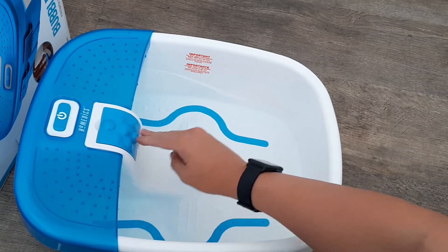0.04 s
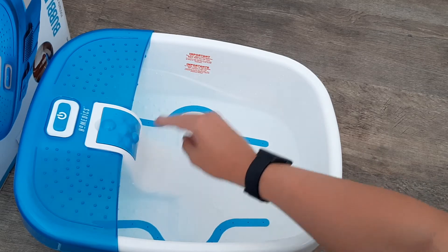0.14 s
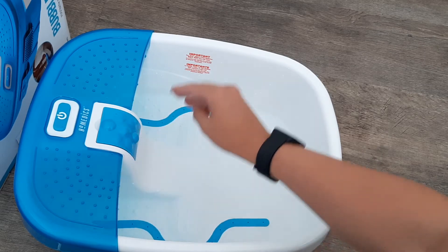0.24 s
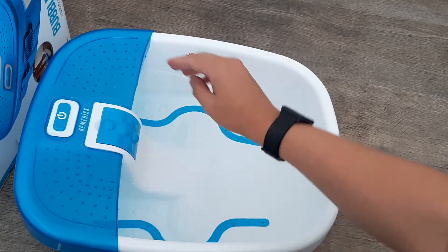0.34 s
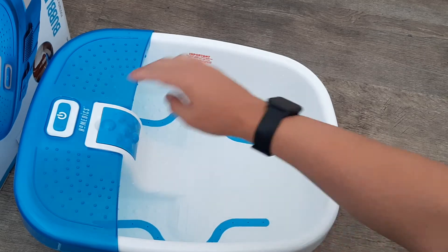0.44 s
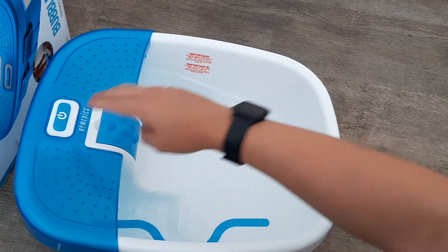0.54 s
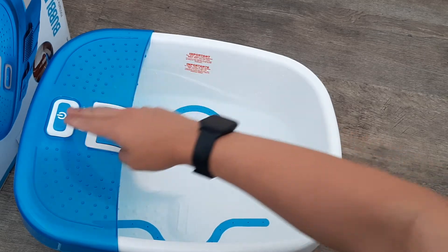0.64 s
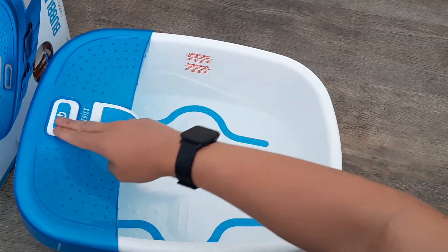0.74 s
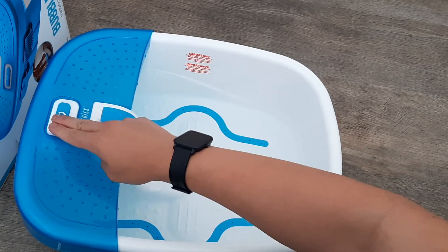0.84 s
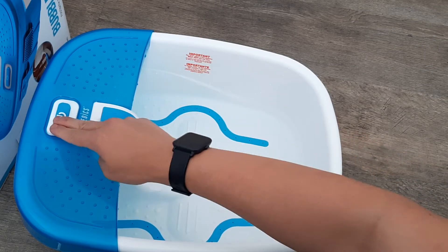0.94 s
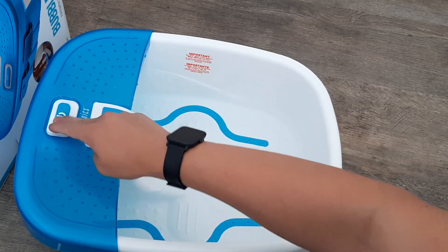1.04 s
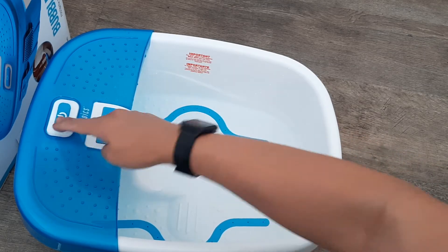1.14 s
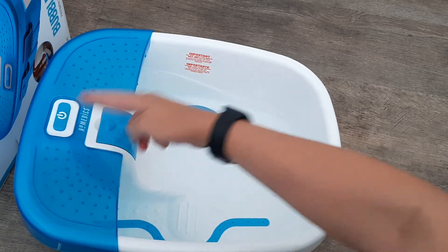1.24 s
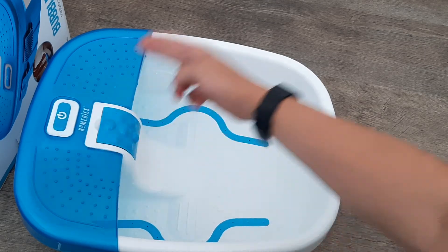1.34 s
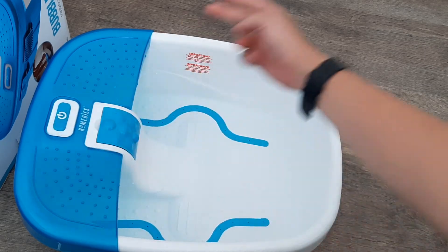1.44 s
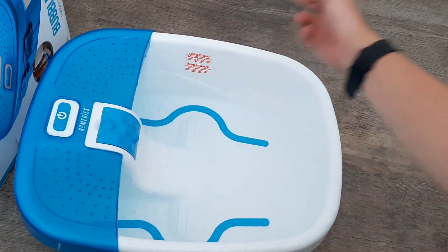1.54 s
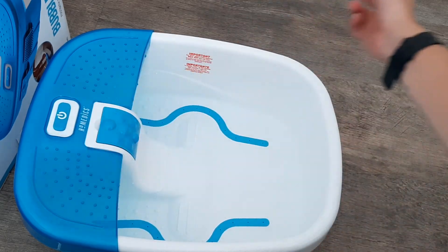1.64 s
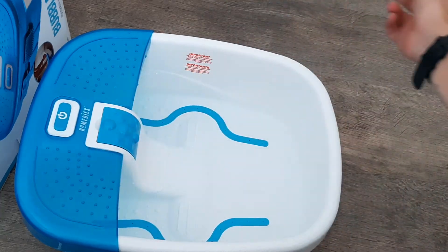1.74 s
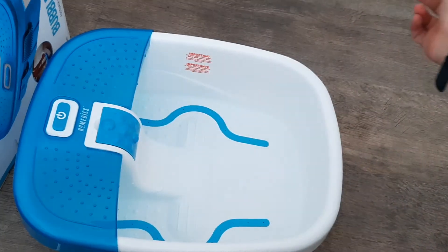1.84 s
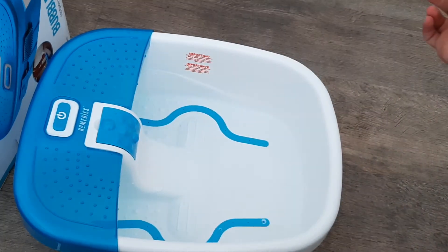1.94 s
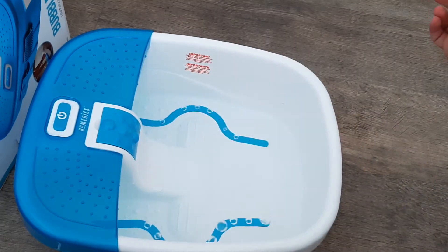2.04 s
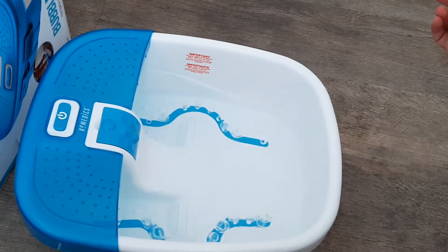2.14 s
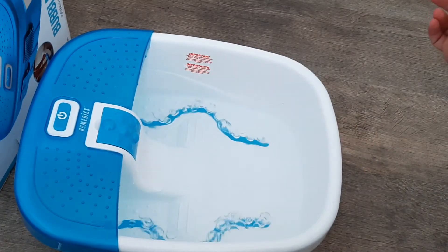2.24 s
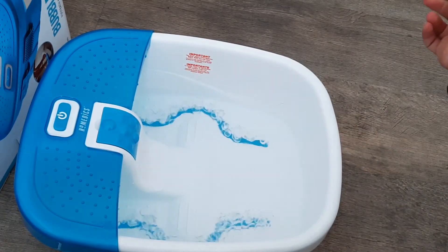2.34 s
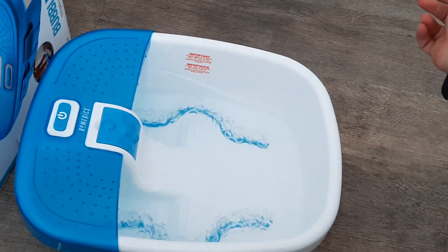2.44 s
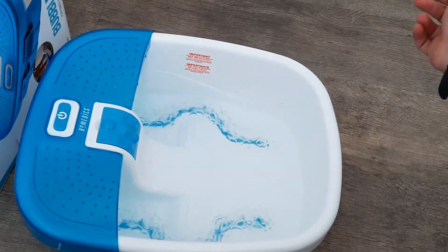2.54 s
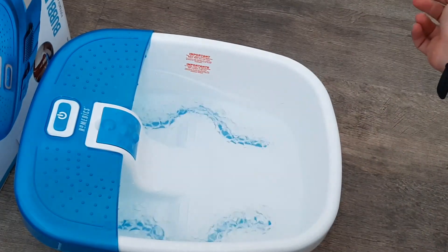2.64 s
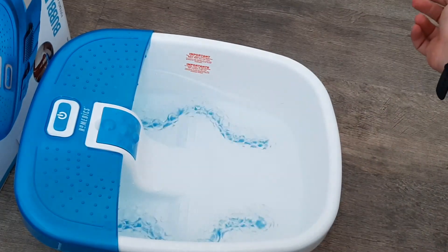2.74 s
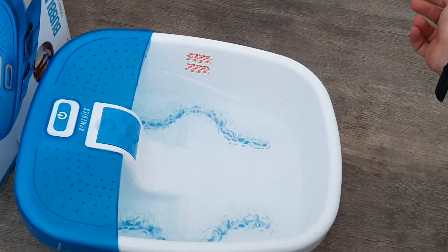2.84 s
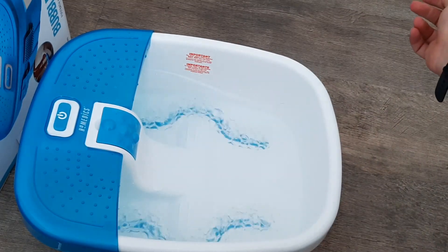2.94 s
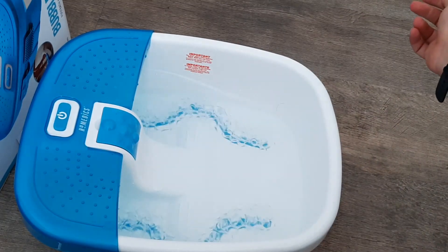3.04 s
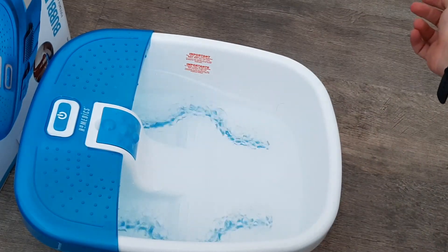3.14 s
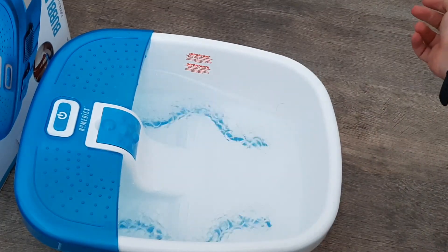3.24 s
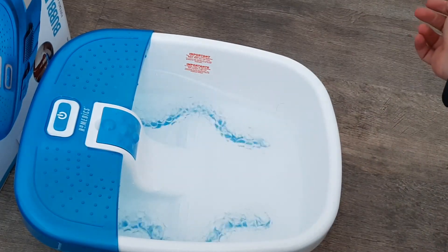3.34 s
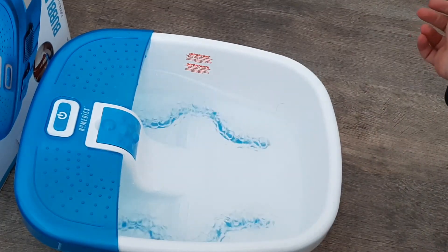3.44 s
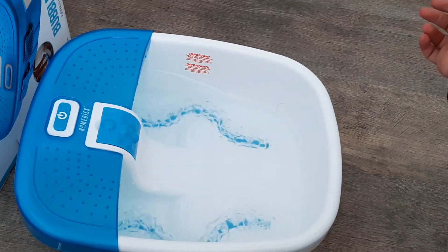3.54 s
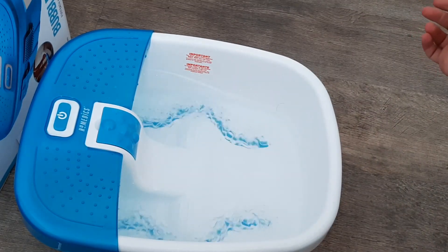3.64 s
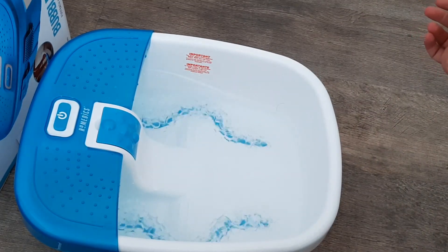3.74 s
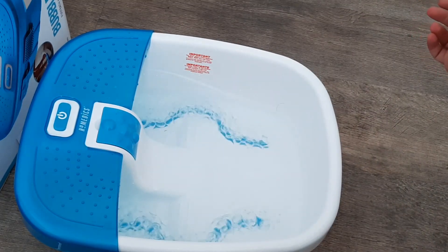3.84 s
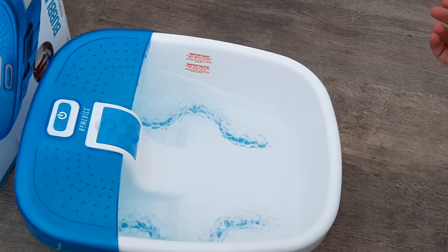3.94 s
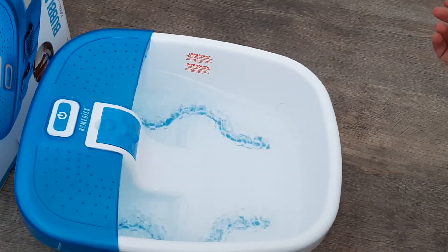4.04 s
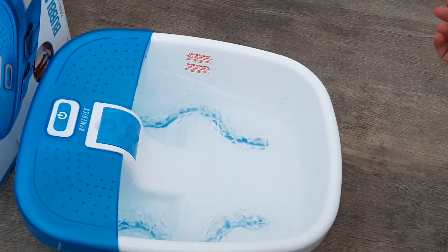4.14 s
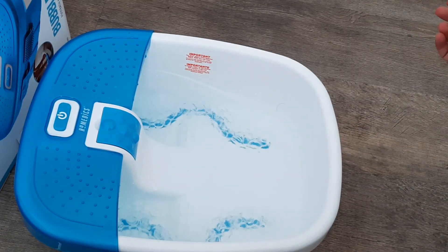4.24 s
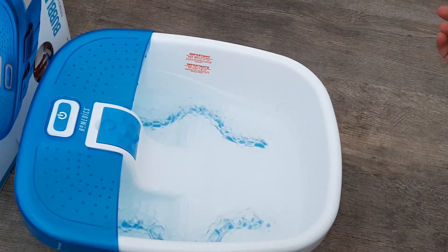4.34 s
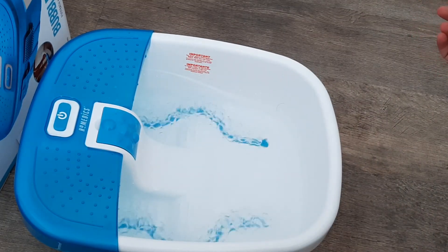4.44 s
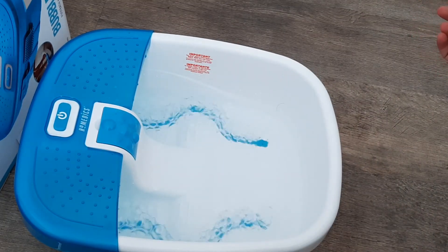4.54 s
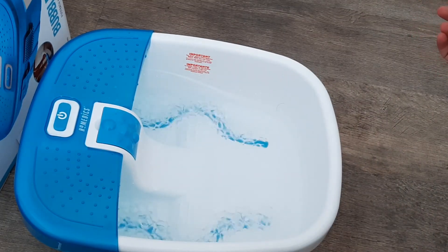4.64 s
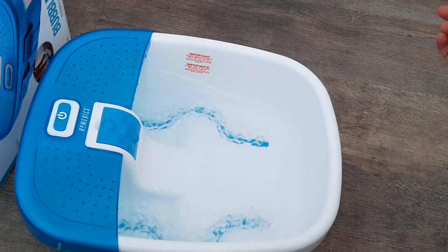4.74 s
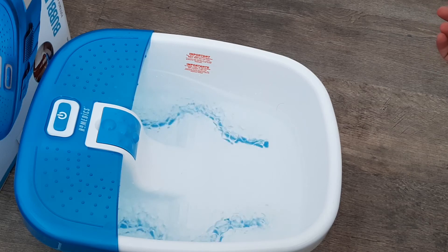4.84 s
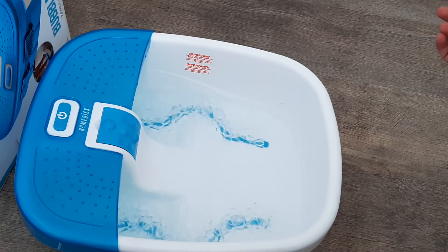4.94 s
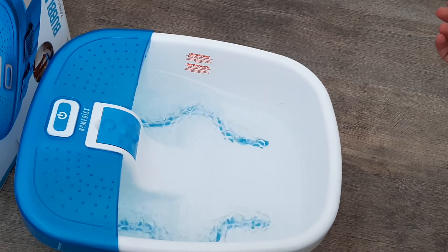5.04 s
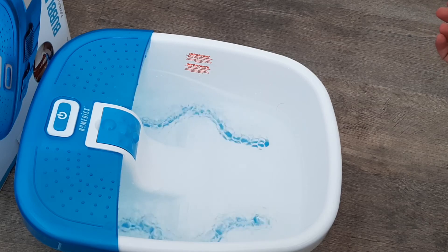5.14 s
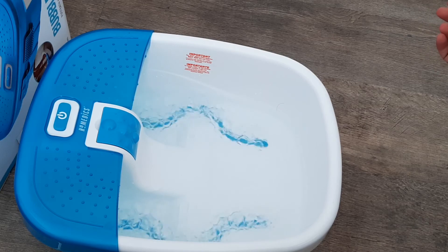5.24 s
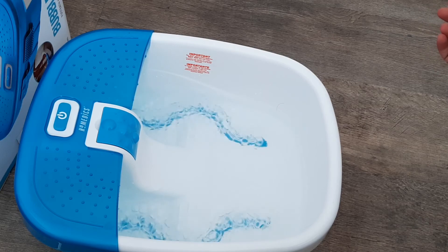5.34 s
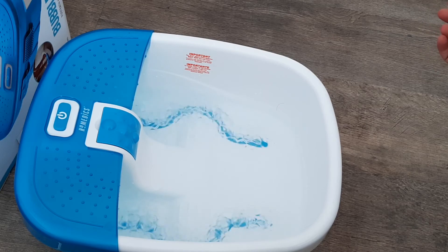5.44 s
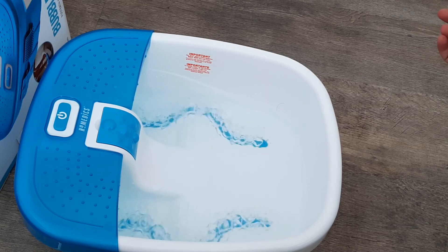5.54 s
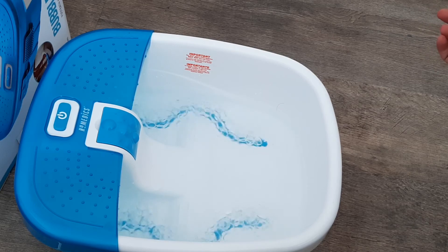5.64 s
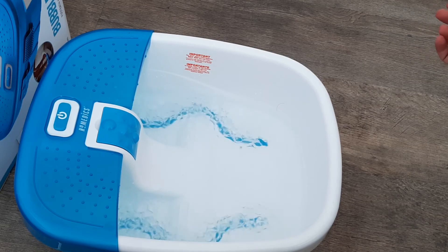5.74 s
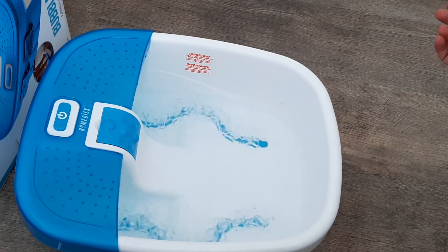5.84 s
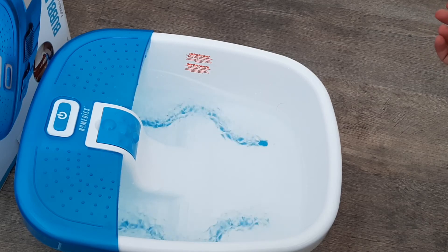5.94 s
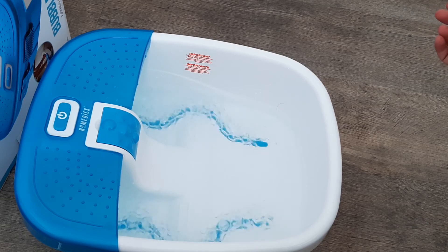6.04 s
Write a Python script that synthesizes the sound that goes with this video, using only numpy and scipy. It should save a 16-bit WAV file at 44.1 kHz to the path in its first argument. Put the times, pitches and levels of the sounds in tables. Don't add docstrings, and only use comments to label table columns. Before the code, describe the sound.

Quiet, bare room with a hard floor. A finger taps a plastic switch, presses it and it snaps back: three dry clicks, each louder. A small air pump spins up at once, its hum and whine gliding upward. About a second later air breaks into the water tub, and dense bubbling with round, hollow gulps continues to the end over the whining motor and hissing air. Close stereo microphone.

```python
import sys
import numpy as np
from scipy import signal
from scipy.fft import rfft, irfft, next_fast_len
from scipy.io import wavfile

SR = 44100
rng = np.random.default_rng(int(sys.argv[2]) if len(sys.argv) > 2 else 0)


def materialize(psi):
    bounded = np.clip(np.atleast_2d(psi).T, -1, 1)
    quanta = np.round(bounded * 32767).astype(np.int16)
    wavfile.write(sys.argv[1], SR, quanta)


def ratio(d):
    e = np.asarray(d, float) / 20
    return 10 ** e


N = 268569
BOIL_S = 2.01


def unit(x):
    return x / np.sqrt(np.mean(x ** 2) + 1e-20)


def along(points, hz):
    f, v = np.transpose(points)
    return np.interp(np.log(hz + 1), np.log(f + 1), v)


def wobble(rate):
    knots = rng.standard_normal((2, int(N * rate / SR) + 4))
    place = np.arange(N) * rate / SR
    return np.array([np.interp(place, np.arange(knots.shape[1]), k) for k in knots], np.float32)


def filtered(x, response):
    m = next_fast_len(x.shape[-1] + SR // 4)
    return irfft(rfft(x, m) * response(np.fft.rfftfreq(m, 1 / SR)), m)[..., :x.shape[-1]]


def ringing(x, modes):
    def response(f):
        total = 0
        for k, (centre, width, db) in enumerate(modes):
            damping = 1j * f * width
            total = total + (-1) ** k * ratio(db) * damping / (centre * centre - f * f + damping)
        return total
    return filtered(x, response)


# (f/Hz, correlation)
PORT_LIKENESS = [(60, 0.84), (180, 1), (550, 0.84), (1650, 0.047), (4970, -0.17), (15000, -0.08)]


def ports(pair):
    def mix(hz):
        angle = np.arccos(np.clip(along(PORT_LIKENESS, hz), -1, 1)) / 2
        return np.array([np.cos(angle), np.sin(angle)])
    mid, side = filtered(pair, mix)
    return np.array([mid + side, mid - side])


def noise(spectrum):
    return unit(filtered(ports(rng.standard_normal((2, N))), lambda hz: ratio(along(spectrum, hz))))


# (f/Hz, level/dB)
PORT_NOTCH = [(7500, 0.5), (8100, -12.5), (8600, -29), (9200, -10.5), (10500, -11), (12000, -1.5),
              (15000, 2)]


def port_gain(hz):
    return ratio(along(PORT_NOTCH, hz))


# (f/Hz, t60/s)
ROOM_DECAY = [(200, 0.32), (600, 0.37), (1500, 0.3), (4000, 0.31), (10000, 0.26)]


def tail():
    hz, t, z = signal.stft(rng.standard_normal((2, SR // 2)), SR, nperseg=256)
    decay = ratio(-60 * t / along(ROOM_DECAY, hz)[:, None])
    echo = ports(signal.istft(z * decay, SR, nperseg=256)[1])
    return echo / np.linalg.norm(echo[0])


def stirred(x):
    stir_s = 0.3
    out, step = np.zeros((2, N + SR)), round(stir_s * SR)
    for start in range(round((BOIL_S - 2 * stir_s) * SR), N, step):
        fade = np.hanning(2 * step)[:N - start] ** 0.5
        part = x[:, start:start + 2 * step] * fade
        answer = signal.fftconvolve(part, tail(), axes=1)
        out[:, start:start + answer.shape[1]] += answer
    return out[:, :N]


# (f/Hz, level/dB per Hz)
CIRCUIT_COLOUR = [(3000, -21), (7000, -15), (10000, -8), (13000, 1), (15500, 5)]


def circuit_hiss():
    return ratio(-78.5) * noise(CIRCUIT_COLOUR)


# (f/Hz, level/dB per Hz)
ROOM_TONE = [(15, -73), (25, -46), (54, -10.5), (75, -4.5), (95, -11), (112, -11), (130, -3.5), (161, -14),
             (265, -12), (299, -22), (362, -21.5), (1090, -31), (1350, -28), (7500, -46.5), (9750, -93),
             (16500, -120)]


def room_tone():
    fast_db = shaft()[1]
    floor_db = np.clip(-43 + 3.1 * fast_db, -69.5, -56)
    return ratio(floor_db + 0.5 + 0.99 * wobble(3.2)) * noise(ROOM_TONE)


# (t/s, level/dB peak, rattle/s)
CONTACTS = [
    (0.779, -38, 0.045),
    (0.99, -25.5, 0.028),
    (1.179, -21, 0.018),
]
# (f/Hz, level/dB per Hz)
TOUCH_COLOUR = [(71, -53), (120, -25), (195, -10), (296, -1.5), (355, -6), (474, -14), (632, -32),
                (680, -26), (1260, -22), (1530, -13), (1970, -31), (3390, -25), (9000, -45), (11700, -78),
                (19800, -120)]
# (f/Hz, level/dB per Hz)
PRESS_COLOUR = [(88, -41), (150, -18), (213, -11), (253, -24), (388, -13), (681, -4.5), (1040, -26.5),
                (1510, 1), (2700, -12), (3750, -6), (4740, -20.5), (6980, -20), (8470, -31), (10100, -15),
                (15500, -27)]
# (f/Hz, level/dB per Hz)
RELEASE_COLOUR = [(88, -38), (150, -18), (411, 0), (480, 0.5), (694, -1), (1060, -20), (1480, -3.5),
                  (2650, -10), (3750, -3.5), (7400, -15.5), (8150, -23), (8640, -85), (9160, -41),
                  (11300, -26), (15500, -30)]


def switch():
    out = np.zeros((2, N))
    t = np.arange(SR // 8) / SR
    for (s, db, rattle_s), colour in zip(CONTACTS, (TOUCH_COLOUR, PRESS_COLOUR, RELEASE_COLOUR)):
        blows = rng.standard_normal(len(t)) * np.exp(-(t / rattle_s) ** 4) * 0.022
        blows[0] = 1
        answer = signal.fftconvolve(blows[None], tail(), axes=1)
        answer[:, 20:90] *= 1.2
        sound = filtered(answer, lambda hz: ratio(along(colour, hz)) / port_gain(hz))
        sound *= 1 - np.exp(-np.arange(sound.shape[1]) / SR / 0.0004)
        level = ratio(db - 1.5) / (0.068 * np.linalg.norm(sound))
        out[:, round(s * SR):][:, :sound.shape[1]] += level * sound
    return out


# (t/s, f/Hz)
SPIN_UP = [(1.18, 25), (1.45, 86), (1.65, 128.6), (1.85, 166.5), (2.05, 198.8), (2.25, 222.1),
           (2.55, 245.5), (2.85, 259.7), (3.25, 270.3), (3.7, 276.9), (4.1, 280.6), (4.7, 283.1),
           (5.3, 284.4), (6.09, 285.35)]


def shaft():
    full_hz = 286
    s, hz = np.transpose(SPIN_UP)
    gap = np.interp(np.arange(N) / SR, s, np.log(full_hz - hz))
    speed = full_hz - np.exp(gap)
    return speed, 20 * np.log10(speed / full_hz)


# (f/Hz, level/dB)
FRAME_PATH = [(90, -100), (133, -60), (164, -33.5), (200, -32.5), (230, -22.5), (247, -31), (263, -25),
              (285, -30.5)]


def unbalance_hum(speed, turn):
    level_db = along(FRAME_PATH, speed) + 1.0 + 0.81 * wobble(20) + [[-0.3], [0.3]]
    return ratio(level_db) * np.sin(turn + [[0], [0.3]])


# (f/Hz, width/Hz, level/dB)
OUTLET_MODES = [(1320, 250, -43), (1717, 24, -29.5), (1782, 28, -31), (1853, 18.8, -29),
                (1904.7, 23.5, -34.5), (1981, 9.8, -42.5), (1991, 9.3, -45)]


def vane_tone(fast_db, turn):
    vane = ratio(2.57 * fast_db + 1.5 * wobble(12) + [[-1], [0]]) * np.sin(7 * turn + [[0], [2.1]])
    return ringing(vane, OUTLET_MODES)


# (multiple, level/dB over the rest)
STANDOUTS = [(6, -8), (8, -12), (9, -6.5), (10, 3), (12, 2), (15, 3), (17, -3), (20, 0), (25, 5), (27, -3),
             (30, 13), (35, -3), (40, 5), (45, 11), (50, -2), (55, 6)]
# (f/Hz, level/dB)
HOUSING_COLOUR = [(300, 21), (1500, -8.5), (2500, -6.5), (4500, -10.5), (7500, -5), (11000, -6),
                  (15000, -31)]


def comb_whine(fast_db, turn):
    extra_db = dict(STANDOUTS)
    comb = np.zeros(N)
    for k in set(range(2, 64)) - {7}:
        flicker, drift = wobble(7)
        comb += ratio(extra_db.get(k, 0)) * np.exp(0.32 * flicker) * np.sin(k * turn + 1.42 * drift)
    level = ratio(-45.5 + 3.3 * fast_db - 12.5)
    comb = filtered(level * comb, lambda hz: ratio(along(HOUSING_COLOUR, hz)))
    return 0.5 * comb + signal.fftconvolve(comb[None], tail(), axes=1)[:, :N]


BAR_MULTIPLES = [1, 3, 4, 5, 6, 8, 9, 10, 11, 12, 14, 15, 16, 17, 20, 25, 27, 29, 30, 35, 40, 45, 50]
BAR_LEVELS = [-38, -42, -47, -40, -44.5, -64.5, -57.5, -52.5, -61.5, -66, -81, -61.5, -58.5, -65, -56.5,
              -60.5, -61, -60, -75, -54, -63, -61, -57]
# (f/Hz, width/Hz, level/dB)
HOUSING_MODES = [(116, 9.1, -2), (164.8, 4.7, 7), (411, 47, 6.5), (505, 25, 5.5), (597, 56, 4.5),
                 (730, 146, -1.5), (1185, 95, 0), (1355, 22, 1.5), (1520, 47, 0), (1643, 9, 5),
                 (1712, 2, 2), (2102, 36, 9.5), (2390, 610, 0.5), (2427, 94, 9)]
# (f/Hz, width/Hz, level/dB)
SHELL_MODES = [(2647, 19, 5.5), (2820, 40, 2.5), (3300, 380, -2.5), (3795, 37, 2.4), (4230, 47, 3),
               (4464, 68, 7), (4825, 23, 7), (5690, 380, -0.5), (7130, 15, 3), (7090, 22, 3.5),
               (7480, 26, 4), (7660, 6.7, -1), (7640, 99, 7.4), (11800, 730, 0.91)]


def bar_whine(fast_db, turn):
    t = np.arange(N) / SR
    build_s, relief_s, bar_count = 0.55, 0.14, 5
    building = 2 * (t - SPIN_UP[0][0]) / build_s - 1
    relief = (BOIL_S - t) / relief_s + 1
    pressure = np.clip(np.minimum(building, relief), -1, 1) * (t < BOIL_S + relief_s)
    strain = ratio(5 * pressure)
    bars = np.zeros((2, N))
    for k, db in zip(BAR_MULTIPLES, BAR_LEVELS):
        beads, drift = wobble(18)
        apart = np.float32([[0], [min(0.44 * k, 1.5)]])
        load = strain if k < 7 or k % bar_count == 0 else 1
        bars += ratio(db) * np.exp(0.37 * beads) * load * np.sin(k * turn + apart + 0.9 * drift)
    return ringing(ratio(2.57 * fast_db) * bars, HOUSING_MODES + SHELL_MODES)


def vane_rub(turn):
    t = np.arange(N) / SR
    rub_s, length_s, panel_hz = 5.06, 0.12, 3183
    squeal = ratio(-45.5) * np.sin(10 * turn) + ratio(-51.5) * np.sin(2 * np.pi * panel_hz * t)
    return np.exp(-((t - rub_s) / length_s) ** 2) * squeal * ratio(2 * wobble(25))


# (f/Hz, level/dB per Hz)
AIR_COLOUR = [(300, -13), (900, -3), (1350, -1.5), (1650, -19), (2000, -9), (2400, -13.5), (3200, -11.5),
              (4500, -12), (5500, -13.5), (7500, -14), (15000, -28.5)]


def air_rush(fast_db):
    stalled_db = np.minimum(-48.5 + 2.53 * fast_db, -61.5)
    flow_db = -45 + 6.3 * fast_db
    return ratio(np.maximum(stalled_db, flow_db) + 3 + 0.8 * wobble(8)) * noise(AIR_COLOUR)


# (f/Hz, level/dB per Hz)
LID_COLOUR = [(40, -63), (70, -20), (134, -8.5), (232, -2.5), (290, -19), (360, 1), (480, 2), (700, -6),
              (1050, -26), (2000, -46)]
# (f/Hz, width/Hz, level/dB)
PANEL_MODES = [(1160, 150, 0), (1490, 60, 8), (1970, 120, 3), (3570, 200, -22), (4360, 110, -6),
               (6100, 310, -10), (7760, 200, 1)]


def lid_drone(fast_db):
    drone_db = np.clip(-37.5 + 4.9 * fast_db, -57, -43)
    rising_db, settling_db = -45 + 1.94 * fast_db, -56 - 5.3 * fast_db
    buzz_db = np.minimum(np.minimum(rising_db, settling_db), -52.5)
    drone = ratio(drone_db + 0.46 * wobble(33)) * noise(LID_COLOUR)
    buzz = ratio(buzz_db) * unit(ringing(rng.standard_normal((2, N)), PANEL_MODES))
    return drone + buzz


def motor():
    speed, fast_db = shaft()
    turn = np.float32(2 * np.pi * (np.cumsum(speed) / SR % 1))
    whine = comb_whine(fast_db, turn) + bar_whine(fast_db, turn) + vane_tone(fast_db, turn)
    whine += vane_rub(turn)
    running = np.clip((np.arange(N) / SR - SPIN_UP[0][0]) / 0.16, 0, 1)
    return running * (unbalance_hum(speed, turn) + whine + air_rush(fast_db) + lid_drone(fast_db))


def bubbles(count, pitch_hz, spread, cycles, scatter_db):
    draw = rng.random((count, 3))
    hz = pitch_hz * np.exp(spread * np.clip(rng.standard_normal(count), -3, 2))[:, None]
    t = np.arange(600) / SR
    life = t * hz / cycles
    sound = np.sin(2 * np.pi * hz * t * (1 + 0.04 * life)) * np.exp(-life) * (1 - np.exp(-t * hz * 3))
    sound *= ratio(-scatter_db * np.log(draw[:, 1:2] + 0.0029))
    strip = (N + 600) * (draw[:, 2:] < 0.5)
    where = (draw[:, :1] * N).astype(int) + np.arange(600) + strip
    strips = np.bincount(where.ravel(), sound.ravel(), 2 * N + 1200).reshape(2, -1)
    return unit(ports(strips[:, :N]))


# (t/s, level/dB peak, f/Hz)
LARGE_BUBBLES = [(2.014, -32.5, 666), (2.062, -32, 403), (2.072, -26, 680), (2.125, -22.5, 580),
                 (2.159, -29, 380), (2.16, -26, 626), (2.257, -20.5, 366), (2.349, -21, 627),
                 (2.437, -18, 696), (2.536, -16.5, 623), (2.622, -18, 620), (2.727, -21, 612.6),
                 (3.028, -15.5, 610), (3.289, -24, 865), (3.45, -18, 579.4), (3.599, -14.5, 584),
                 (3.736, -18, 583), (3.944, -15, 612), (4.404, -15.5, 640), (4.539, -22, 605),
                 (4.934, -17, 616), (5.037, -14.5, 596), (5.166, -20, 620), (5.314, -18.5, 610),
                 (5.484, -28, 610), (5.65, -37, 576), (5.814, -20, 613)]


def boil():
    t = np.arange(N) / SR
    fill_s, hold_s, hold_lead_s = 0.14, 0.0085, 0.013
    level_db = -34 - 25.5 * np.exp(-np.maximum(t - BOIL_S, 0) / fill_s) + 1.34 * wobble(14)[0]
    for s, _, _ in LARGE_BUBBLES:
        level_db -= 5.5 * np.maximum(1 - np.abs(t - s + hold_lead_s) / hold_s, 0)
    return ratio(level_db) * np.clip((t - BOIL_S) / 0.05 + 1, 0, 1)


def pops(rows, t60, rise, climb):
    out, t = np.zeros(N + SR), np.arange(SR // 10) / SR
    for s, db, hz in rows:
        envelope = ratio(db - 60 * t / t60) * (1 - np.exp(-t / rise))
        out[round(s * SR):][:len(t)] += np.sin(2 * np.pi * hz * t * (1 + climb * t)) * envelope
    return out[:N]


# (t/s, level/dB peak)
FILMS = [(2.5082, -44), (2.7581, -46), (2.8738, -43), (3.0664, -45), (3.1507, -59), (3.5518, -43),
         (4.0781, -56), (4.127, -49), (4.1784, -60), (4.8449, -51), (4.9282, -48), (5.0524, -52),
         (5.7204, -48), (5.9449, -51)]


def film_bursts():
    bursts = np.zeros((2, N))
    for s, db in FILMS:
        fade = ratio(db + 6 - np.arange(200) * 0.2)
        bursts[:, round(s * SR):][:, :200] += fade * rng.standard_normal((2, 200))
    return filtered(bursts, lambda hz: ratio(along([(7000, -37), (10000, 13), (16000, -7)], hz)))


# (t/s, level/dB peak, f/Hz)
DROPLETS = [
    (2.79, -35, 2040),
    (4.16, -33, 2020),
]
# (f/Hz, width/Hz, level/dB)
TUB_MODES = [(164.4, 18.3, -4), (337, 53, -6), (428.6, 31, -11), (516, 130, -15.5), (616.6, 38, 1.5),
             (727, 53, -4.5), (773, 76, -10), (910, 58, -4), (1173, 12, -2.5), (1497, 46, -3.5)]


def water():
    stream = bubbles(count=3500, pitch_hz=647, spread=0.43, cycles=1.3, scatter_db=3)
    churn = noise([(60, -15), (150, 0.5), (250, -6), (700, -7), (1500, -12.0), (3000, -59)])
    small = bubbles(count=2600, pitch_hz=857, spread=0.318, cycles=2.6, scatter_db=1.0)
    tub = ratio(-2.5) * unit(ringing(stream + ratio(-2.5) * churn, TUB_MODES))
    gulps = pops(LARGE_BUBBLES, t60=0.027, rise=0.0011, climb=1.0)
    drips = pops(DROPLETS, t60=0.07, rise=0.003, climb=0.8)
    return boil() * (tub + ratio(-6.5) * small) + gulps + drips + film_bursts()


def scene():
    clicks, pump, wet = switch(), motor(), water()
    balance = ratio(np.array([[-1.1], [1.1]]))
    return balance * (clicks + pump + ratio(-1.0) * wet + ratio(-0.5) * stirred(wet))


def roll_off(x):
    return signal.sosfilt(signal.butter(12, 15610, fs=SR, output="sos"), x)


def record(dry):
    air = dry + room_tone()
    heard = filtered(air, lambda hz: port_gain(hz) / (1 + (38 / (hz + 1)) ** 6))
    return roll_off(circuit_hiss() + heard)


dry = scene()
out = record(dry)
materialize(out)
```